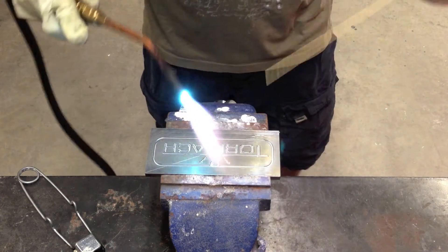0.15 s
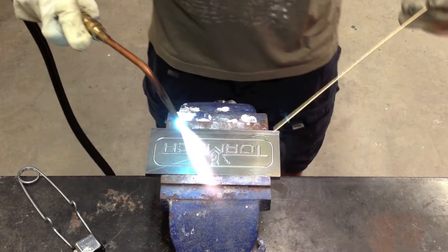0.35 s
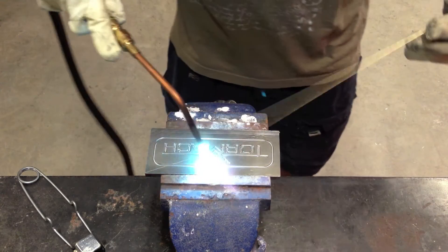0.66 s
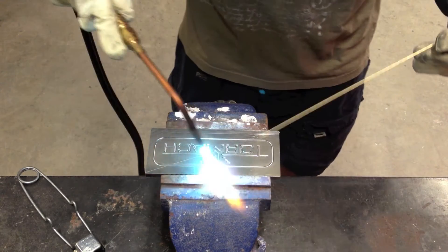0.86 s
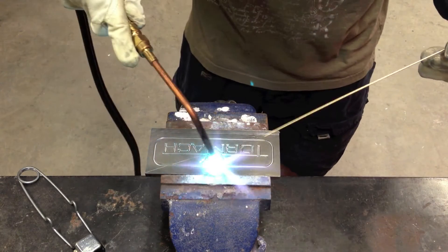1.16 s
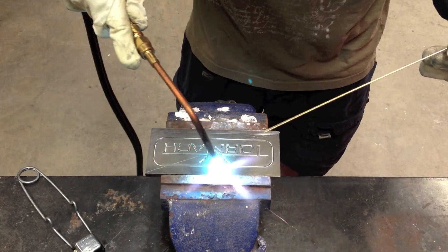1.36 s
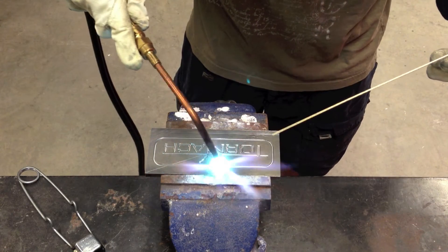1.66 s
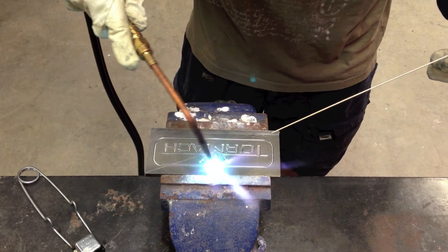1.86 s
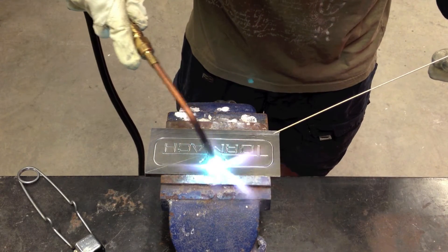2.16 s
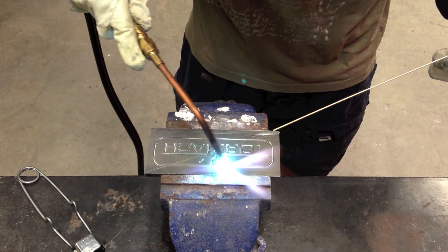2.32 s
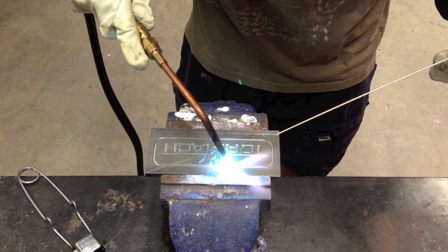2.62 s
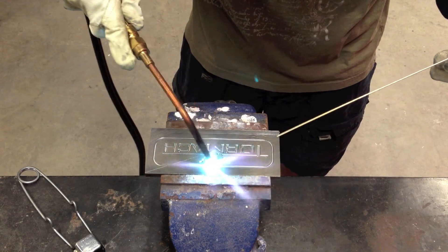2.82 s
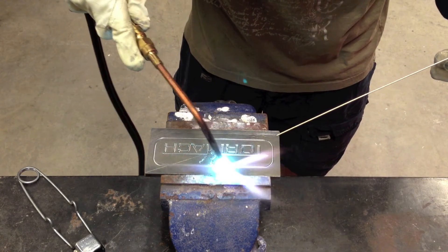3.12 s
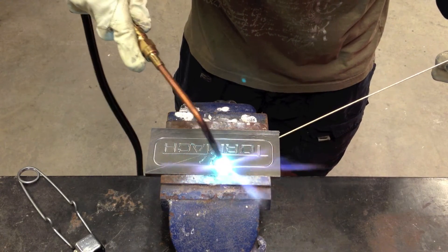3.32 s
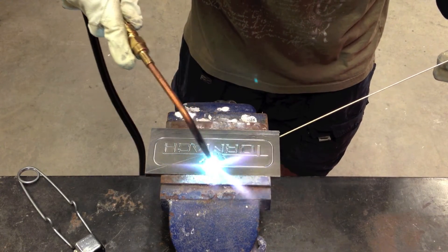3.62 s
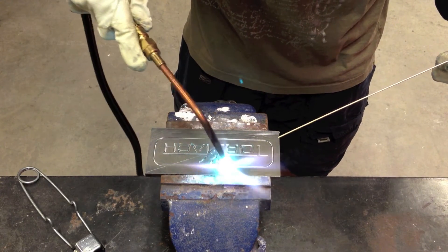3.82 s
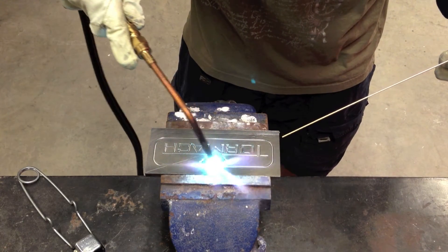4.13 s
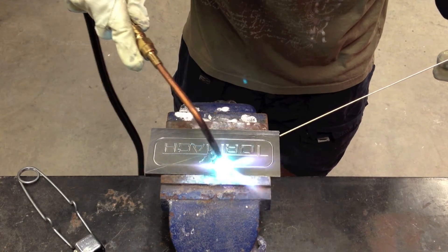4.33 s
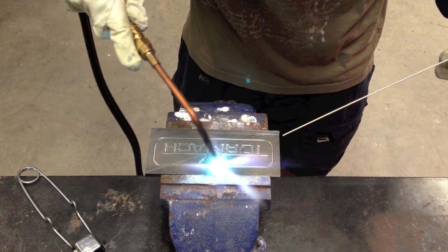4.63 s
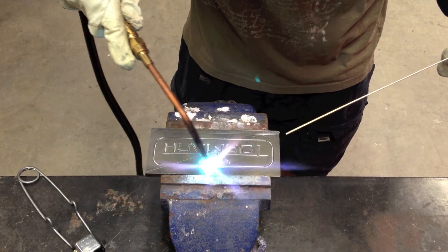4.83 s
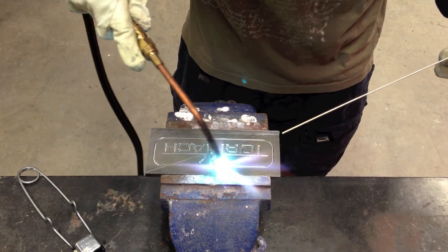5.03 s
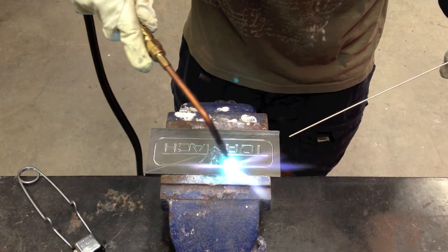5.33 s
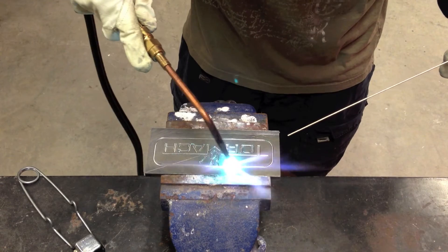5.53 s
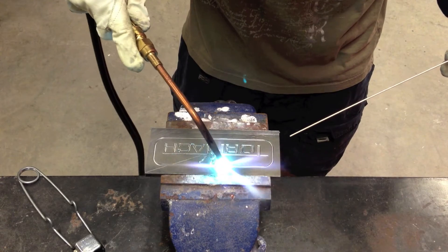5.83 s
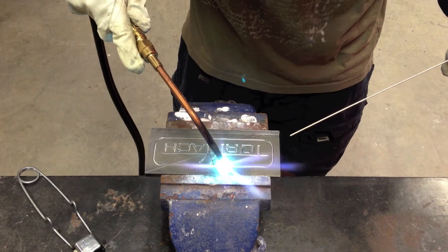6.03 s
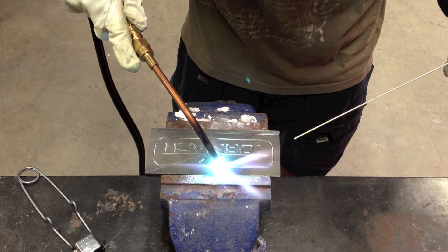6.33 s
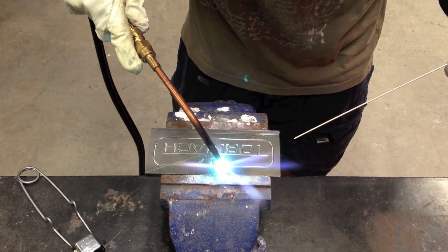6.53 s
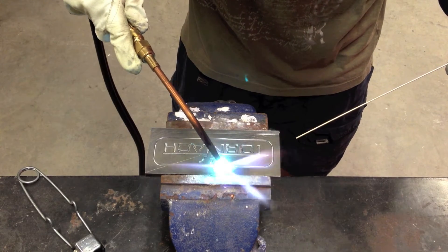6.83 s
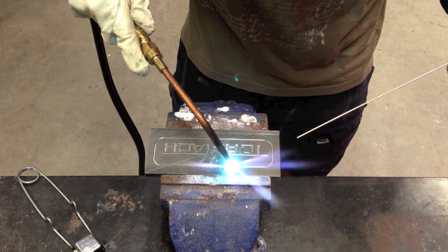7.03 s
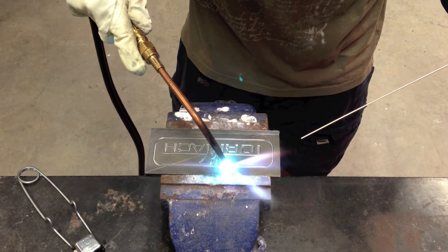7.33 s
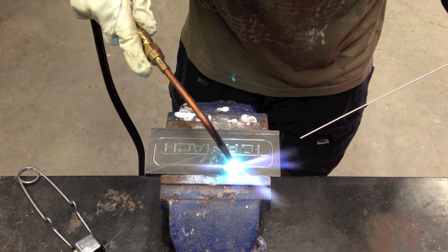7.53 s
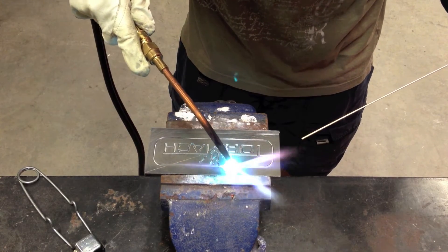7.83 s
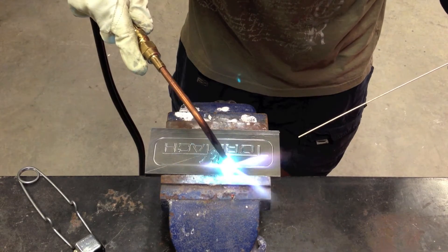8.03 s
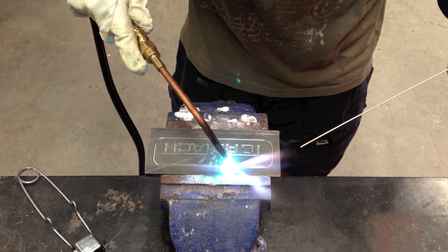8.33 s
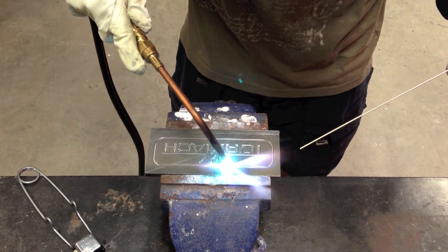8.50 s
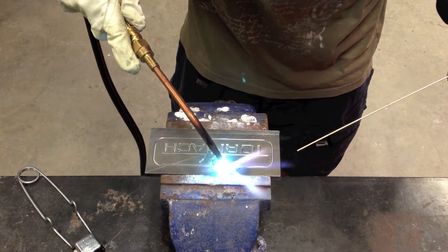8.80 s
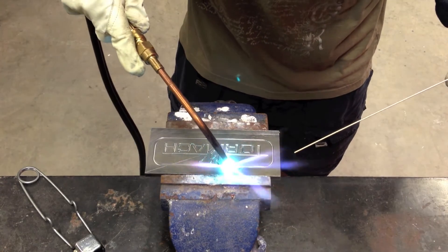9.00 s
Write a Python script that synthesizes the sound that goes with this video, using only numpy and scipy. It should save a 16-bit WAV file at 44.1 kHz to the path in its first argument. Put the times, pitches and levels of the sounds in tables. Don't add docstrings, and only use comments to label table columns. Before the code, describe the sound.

Close burning jet of a welding torch roars and sizzles over a metal plate, then suddenly switches to a more distant, thin, stuttering hiss.

```python
import sys
import numpy as np
from scipy import signal
from scipy.fft import rfft, irfft, next_fast_len
from scipy.io import wavfile
from scipy.ndimage import uniform_filter1d, map_coordinates

SR = 44100
rng = np.random.default_rng(int(sys.argv[2]) if len(sys.argv) > 2 else 0)


def boost_factor(decibels):
    exponent = np.asarray(decibels, float) / 20
    return 10 ** exponent


def store_wav(level_fs):
    pcm = np.round(np.clip(np.atleast_2d(level_fs), -1, 1) * 32767)
    wavfile.write(sys.argv[1], SR, pcm.T.astype(np.int16))


N = 403941

CUT_S = 4.8565
NEAR_TOP_HZ, FAR_TOP_HZ = 15285, 15760
SOUND_CM_PER_S = 34300
HOLLOW_DB_PER_CM, HOLLOW_MAX_DB, HOLLOW_ENDS_S = 2, 6, 0.94
OVERTONE_DB = 0
RIDGE_DB, RIDGE_ENDS_S = 2.5, 0.89
ROAR_DB, ROAR_BELOW, ROAR_TOP_HZ = 3.5, 0.62, 4400
TOUCH_S = 1.084
REACH_OCT_PER_DB = 0.23
SLIP_CHANCE, SLIP_DB = 0.005, -6

# frequency in Hz, level in dB per Hz.
NEAR_COLOUR = [(60, -51), (95, -18), (129, -5), (226, -6.5), (444, -5.5), (637, -2.5), (1090, -4.5),
               (1610, -7.5), (2890, -10.5), (5420, -12), (6300, -7.5), (7440, -4), (9750, -6.5),
               (12500, -1)]
NEAR_SPLITS_HZ = [400, 1300, 3000, 6000, 9800]
# frequency in Hz, width in Hz, boost in dB.
NEAR_RESONANCES = [(240, 9, 8), (343, 18, 5), (403, 8, 11), (452, 35, -6), (547, 30, 5), (659, 25, 5),
                   (755, 25, 4), (812, 50, 4), (910, 30, 4), (1015, 25, -5), (1120, 40, -4), (1215, 25, -5),
                   (1330, 70, 4), (1430, 60, 2), (1577, 45, 3), (1620, 20, -4), (1652, 40, 4),
                   (1955, 30, 4), (2590, 80, 3), (3310, 150, 2), (4970, 250, 3), (5500, 300, 1.5),
                   (7600, 300, .5)]

NEAR_LEVEL_DB = [-47, -40.5, -38.5, -38.5, -28.5, -25]
FREE_AIR_DB = [3.5, 5.5, 6, 6, -7.5, -4]
LANDED_S = [0.87, 1.32, 1.155, 1.156, 0.94, 3.6]
LANDING_FADE_S = [.4, 0.77, .05, .06, 0.17, 2.2]
LIFT_SHARE = [0.34, 0.71, 1.03, 1.3, 0.4, 0.046]
PUFF_SHARE = [0.19, 0.98, 0.41, -0.21, 0.17, 0.06]
SWING_SHARE = [0, 0.063, 0.16, 0.047, 0.38, 1.36]
FLARE_SHARE = [0.087, 0, 0.15, 0, 1.43, 0]

# time in seconds, length in seconds, change in dB.
TIP_LIFTS = [(1.192, 0.14, -0.5), (1.332, 0.12, 5), (1.448, 0.119, -4), (1.621, 0.11, -2),
             (1.8, 0.175, -5.5), (2.089, 0.16, -4), (2.282, 0.089, 1.7), (2.549, 0.066, -2.5),
             (2.662, 0.13, 3), (2.819, 0.23, -3.5), (3.212, 0.11, 1.2), (3.317, 0.097, -5.5),
             (3.43, 0.05, 0.2), (3.72, 0.22, -1.9), (3.902, 0.19, 2), (4.024, 0.071, -1), (4.39, 0.13, 1.5),
             (4.574, 0.11, -4), (4.673, 0.151, 1), (4.834, 0.067, -4.9)]
# time in seconds, length in seconds, change in dB.
PLUME_PUFFS = [(0.715, 0.06, -5), (.865, .07, 4), (0.97, 0.12, -4.5), (1.297, 0.18, -2), (1.92, 0.057, 4),
               (2.475, 0.069, -5), (2.575, 0.13, 3.5), (2.655, 0.082, -5), (2.901, 0.22, -2),
               (3.091, 0.14, -1.5), (3.325, 0.078, -6), (3.65, 0.28, -2.3), (4.068, 0.057, -3),
               (4.498, 0.1, -2.5), (4.59, 0.055, -2.5), (4.66, .08, 1), (4.85, 0.047, -6)]
# time in seconds, length in seconds, change in dB.
JET_SWINGS = [(0.12, 0.173, 3.7), (0.891, 0.048, -8), (0.952, 0.2, 5), (1.231, 0.1, 4.5),
              (1.369, 0.14, -5.5), (1.467, 0.17, 6.5), (1.551, 0.12, -5.5), (1.659, 0.1, 3.6),
              (1.861, 0.041, -3), (2.025, 0.058, 3.5), (2.102, 0.087, -1.5), (2.237, 0.065, 4.5),
              (2.316, 0.17, -6), (2.424, 0.07, 4.5), (2.684, 0.12, -12), (2.71, 0.25, 8),
              (2.912, 0.083, 4.5), (3.091, 0.12, -9), (3.251, 0.31, 5), (3.653, 0.142, 5),
              (3.812, 0.092, -9.5), (4.316, 0.282, 3)]
# time in seconds, length in seconds, change in dB.
CONE_FLARES = [(0.712, 0.091, 4.5), (0.842, 0.045, -2), (1.172, 0.31, -4.5), (1.494, 0.078, -3),
               (1.679, 0.142, -3.1), (1.96, 0.5, -1.6), (2.412, 0.084, -4), (2.896, 0.21, -3),
               (3.003, 0.26, 3), (3.656, 0.17, -5), (3.809, 0.098, 2.5), (3.953, 0.16, -6.5),
               (4.588, 0.066, 2.9), (4.809, 0.13, -3.5)]

# time in seconds, detour of the plate's reflection in cm.
TIP_DESCENT = [
    (0, 12.7),
    (.15, 12),
    (.21, 7.4),
    (.37, 7),
    (.43, 5.2),
    (.5, 3.3),
    (.62, 3),
    (.75, 2.9),
]
# time in seconds, frequency in Hz.
RIDGE_GLIDE = [
    (0, 1040),
    (.3, 1180),
    (.47, 1730),
    (.62, 2600),
]
# time in seconds, delay in milliseconds, strength.
BENCH_ECHO = [
    (0, 1.285, .36),
    (.3, 1.262, .29),
    (.52, 1.24, .16),
    (.8, 1.165, .07),
    (.95, 1.14, .09),
    (1.3, 1.18, .13),
    (2, 1.2, .16),
    (4.9, 1.21, .11),
]

# frequency in Hz, level in dB per Hz.
FAR_COLOUR = [(250, -35), (379, -18.5), (517, -8.5), (798, -8.5), (1030, -10), (1570, -9), (2300, -3.5),
              (3300, -6), (4360, -7.5), (6490, -5.5), (8000, -7), (10200, -8.5), (11300, -10.5),
              (13300, -9)]
FAR_SPLITS_HZ = [1890, 10140, 12300]
# frequency in Hz, width in Hz, boost in dB.
FAR_RESONANCES = [(415, 30, 5), (483, 25, -5), (525, 30, 3), (790, 40, -4), (925, 35, 4), (966, 25, 6),
                  (1290, 25, 4), (1660, 60, -5), (1030, 70, -4), (1380, 50, 4), (1830, 130, -7),
                  (1940, 90, 4), (2060, 60, -6), (2270, 60, -4), (3030, 60, 3), (3330, 200, 3),
                  (3700, 400, 2), (4070, 70, -5), (4720, 60, -1.5), (5320, 60, 4), (6170, 70, -5),
                  (6620, 150, 3), (7940, 90, -5)]
# delay in milliseconds, strength.
FAR_BENCH_ECHOES = [(0.316, 0.11), (0.433, -0.081), (0.581, -0.017), (.63, -0.056), (2.41, 0.1),
                    (2.46, -0.14), (2.9, -.09), (3.03, -0.07), (3.53, -0.08), (3.62, 0.033)]

FAR_LEVEL_DB = [-46, -38, -44.5, -51]
STRIKE_SHARE = [0.25, 0.98, 2, .8]
STUTTER_SHARE = [0.32, 1.22, 1.6, 1]
HEATING_DB_PER_S = [0.18, 0.026, -1.75, -0.2]

# time in seconds, level in dB.
STRIKE_LEVEL = [
    (4.86, -6),
    (5.03, 1.5),
    (5.15, -0.4),
    (6.3, 0.5),
    (6.6, -2.5),
    (7.85, -3),
    (7.97, 0.4),
    (8.85, 0),
    (9.16, -8),
]
# time in seconds, length in seconds, change in dB.
JET_STUTTERS = [(4.89, 0.04, -4.7), (5.259, 0.022, -2.8), (5.391, 0.037, -3.5), (5.476, 0.039, -9),
                (5.56, 0.022, -14), (5.617, 0.028, -1), (6.063, 0.045, -6.7), (6.125, 0.034, -2.5),
                (6.324, 0.034, -3.3), (6.464, 0.024, -4.2), (6.603, 0.053, -7.3), (6.721, 0.034, -7),
                (6.817, 0.047, -4.8), (6.959, 0.079, -1.5), (7.069, 0.035, -6), (7.122, 0.047, -9),
                (7.251, 0.032, -2), (7.522, 0.078, -7.8), (7.647, 0.083, -11), (8.182, 0.05, -1.5),
                (8.593, 0.037, -9), (8.929, 0.06, -2.5), (8.997, 0.06, -10.5), (9.169, 0.084, -11)]
# time in seconds, length in seconds, change in dB.
JET_SURGES = [
    (5.78, .06, 0.5),
    (6.188, 0.033, 0),
    (6.28, .05, 1.5),
    (7.986, .07, 1.5),
    (8.733, 0.034, 2),
    (8.8, .04, 2.5),
]
# time in seconds, level in dB.
WHISTLE_LEVEL = [
    (4.9, -62),
    (6, -60.5),
    (7, -56),
    (9.16, -57),
]
# frequency in Hz, level in dB per Hz.
HISS_COLOUR = [(380, -14), (520, 0), (1000, -7), (2000, -12), (5000, -10), (10000, -7), (12000, -6),
               (14500, 0.5)]


def near_flame():
    air = turbulence(patchy_db=0.87, grit_db=0.85)
    layers = parts(air, NEAR_COLOUR, NEAR_RESONANCES, NEAR_SPLITS_HZ, soft=0.17)
    t = np.arange(N) / SR
    flare_db = bumps(CONE_FLARES)
    moves = np.array([bumps(TIP_LIFTS), bumps(PLUME_PUFFS), bumps(JET_SWINGS), flare_db])
    shares = np.transpose([LIFT_SHARE, PUFF_SHARE, SWING_SHARE, FLARE_SHARE])
    moves_db = shares @ moves + 0.15 * wobble(14)
    own_db = [0.51, 0.74, 0.33, 0.77, 0.8, 0.72]
    flame = np.zeros(N)
    for i, layer in enumerate(layers):
        free_db = FREE_AIR_DB[i] * fading(t, LANDED_S[i], LANDING_FADE_S[i])
        level_db = NEAR_LEVEL_DB[i] + free_db + moves_db[i] + own_db[i] * wobble(12)
        flame += boost_factor(level_db) * layer
    return bench_echo(plume(flame, flare_db))


def plume(x, flare_db):
    hz, t, z = signal.stft(x, SR, nperseg=512)
    hz = hz[:, None]
    detour_cm = np.interp(t, *np.transpose(TIP_DESCENT))
    hollow_hz = SOUND_CM_PER_S / (2 * detour_cm)

    def bell(centre_hz, octaves):
        return np.exp(-(np.log2((hz + 1) / centre_hz) / octaves) ** 2)

    reach = 2 ** (REACH_OCT_PER_DB * np.interp(t, np.arange(N) / SR, flare_db))
    edge_hz = np.minimum(ROAR_BELOW * hollow_hz, ROAR_TOP_HZ) * reach
    shelf = (1 / (1 + ((hz + 1) / edge_hz) ** 8) - .55) * (hz > 440)
    roar_db = ROAR_DB * fading(t, TOUCH_S, 0.052) * shelf
    depth_db = np.minimum(HOLLOW_DB_PER_CM * detour_cm, HOLLOW_MAX_DB) * fading(t, HOLLOW_ENDS_S, .3)
    comb = OVERTONE_DB / HOLLOW_MAX_DB * bell(2 * hollow_hz, .4) - bell(hollow_hz, .2)
    ridge_hz = np.interp(t, *np.transpose(RIDGE_GLIDE))
    ridge_db = RIDGE_DB * fading(t, RIDGE_ENDS_S, .15) * bell(ridge_hz, 0.1)
    gain = boost_factor(ridge_db + roar_db + depth_db * comb)
    return signal.istft(z * gain, SR, nperseg=512)[1][:N]


def bench_echo(flame):
    delay_ms, strength = curves(BENCH_ECHO)
    delay_ms = delay_ms + .008 * wobble(20)

    def late(ms):
        return map_coordinates(flame, [np.arange(N) - ms * SR / 1000])

    return flame + strength * (late(delay_ms) - .9 * late(delay_ms + .05))


def far_flame():
    air = turbulence(patchy_db=0.93, grit_db=1.1)
    layers = parts(air, FAR_COLOUR, FAR_RESONANCES, FAR_SPLITS_HZ, soft=0.19)
    stutter_db = bumps(JET_STUTTERS) + bumps(JET_SURGES)
    heating_s = np.arange(N) / SR - CUT_S
    moves = np.array([curves(STRIKE_LEVEL)[0], stutter_db, heating_s, wobble(25)])
    flicker_db = [0.52, 0.45, 0.96, .9]
    moves_db = np.transpose([STRIKE_SHARE, STUTTER_SHARE, HEATING_DB_PER_S, flicker_db]) @ moves
    own_db = [0.24, 0.3, .9, 1.3]
    flame = np.zeros(N)
    for i, layer in enumerate(layers):
        flame += boost_factor(FAR_LEVEL_DB[i] + moves_db[i] + own_db[i] * wobble(18)) * layer

    def echoes(hz):
        return 1 + sum(g * np.exp(-2j * np.pi * hz * ms / 1000) for ms, g in FAR_BENCH_ECHOES)

    return filtered(flame, echoes)


def whistle():
    phase = 2 * np.pi * np.cumsum(1613 + 4 * wobble(30)) / SR
    level_db = curves(WHISTLE_LEVEL)[0] + 0.52 * wobble(14)
    return np.sqrt(2) * boost_factor(level_db) * np.sin(phase)


def steady_hiss():
    noise = rng.standard_normal(N)
    return boost_factor(-42) * unit(filtered(noise, lambda hz: boost_factor(along(HISS_COLOUR, hz))))


def room(x, wet_db, dull):
    t = np.arange(SR // 8) / SR
    tail = rng.standard_normal(len(t)) * boost_factor(-60 * t / 0.22) * (t > .004)
    tail = signal.lfilter([1 - dull], [1, -dull], tail / np.linalg.norm(tail))
    return x + boost_factor(wet_db) * signal.fftconvolve(x, tail)[:N]


def dropouts(x):
    hz, t, z = signal.stft(x, SR, nperseg=1024)
    hz = hz[:, None]

    def smooth(a):
        return uniform_filter1d(uniform_filter1d(a, size=5, axis=0), size=18, axis=1)

    level_db = 10 * np.log10(np.abs(smooth(np.abs(z) ** 2)) + 1e-14)
    weak_db = np.median(level_db, axis=1, keepdims=True) - level_db
    chance = unit(smooth(rng.standard_normal(z.shape))) + .13 * np.clip(weak_db, -9, 6)
    muted = chance > 2.25 + .9 * (hz < 8500) + 3 * (hz < 4500)
    return signal.istft(z * np.where(muted, boost_factor(-22), 1), SR, nperseg=1024)[1][:N]


def band(x, low_hz, top_hz, order, skirt_hz):
    def response(hz):
        bass_cut = 1 / (1 + (low_hz / (hz + 1)) ** order)
        return bass_cut / (1 + np.exp(np.clip((hz - top_hz) / skirt_hz, -50, 50)))

    return filtered(x, response)


def low_floor(after):
    floor = unit(band(rng.standard_normal(N), 40, 450, order=1, skirt_hz=60))
    return floor * boost_factor(-80 * (1 - after) - 89.5 * after + 1.5 * wobble(15))


def slips(x):
    hz, t, z = signal.stft(x[0], SR, nperseg=2048)
    bands_hz = np.array([4200, 5400, 6800, 8300, 9800, 11300, 12500, 14000, 15700])
    chosen = rng.random((len(bands_hz) - 1, len(t))) < SLIP_CHANCE
    chosen = np.pad(chosen, ((1, 1), (0, 0)))[np.searchsorted(bands_hz, hz)]
    random_phase = np.exp(2j * np.pi * rng.random(z.shape))
    side = signal.istft(chosen * np.abs(z) * boost_factor(SLIP_DB) * random_phase, SR, nperseg=2048)[1][:N]
    return x + np.array([side, -side])


def turbulence(patchy_db, grit_db):
    z = signal.stft(rng.standard_normal(N), nperseg=512)[2]
    field = uniform_filter1d(rng.standard_normal(z.shape), size=7, axis=0)
    field = uniform_filter1d(field, size=12, axis=1)
    air = signal.istft(z * boost_factor(patchy_db * unit(field)), nperseg=512)[1][:N]
    return air * boost_factor(grit_db * wobble(800))


def parts(air, tone, modes, splits, soft):
    edges = np.concatenate([[1], splits, [SR]])

    def above(hz, edge):
        return 1 / (1 + (edge / (hz + 1)) ** (1 / soft))

    def colour_db(hz):
        return along(tone, hz) + sum(db / (1 + (2 * (hz - c) / w) ** 2) for c, w, db in modes)

    def region(low, high):
        return filtered(air, lambda hz: boost_factor(colour_db(hz)) * (above(hz, low) - above(hz, high)))

    return [unit(region(low, high)) for low, high in zip(edges[:-1], edges[1:])]


def bumps(rows):
    t = np.arange(0, N + 64, 64) / SR
    s, length, db = np.transpose(rows)[..., None]
    total_db = np.sum(db * np.exp(-(2 * (t - s) / length) ** 2), axis=0)
    return np.interp(np.arange(N) / SR, t, total_db)


def fading(t, end, span):
    return np.clip((end - t) / span, 0, 1)


def curves(rows):
    s, *columns = np.transpose(rows)
    return [np.interp(np.arange(N) / SR, s, column) for column in columns]


def wobble(rate):
    return map_coordinates(rng.standard_normal(int(N * rate / SR) + 4), [np.arange(N) * rate / SR])


def along(points, hz):
    f, v = np.transpose(points)
    return np.interp(np.log(hz + 1), np.log(f + 1), v)


def filtered(x, response):
    m = next_fast_len(N + 8192)
    return irfft(rfft(x, m) * response(np.fft.rfftfreq(m, 1 / SR)), m)[..., :N]


def unit(x):
    return x / np.sqrt(np.mean(x ** 2) + 1e-20)


def scene():
    near = room(near_flame(), wet_db=-13, dull=.6)
    near = band(dropouts(near), 64, NEAR_TOP_HZ, order=4, skirt_hz=14)
    far = room(far_flame(), wet_db=-16, dull=.2)
    far = band(far + steady_hiss() + whistle(), 403, FAR_TOP_HZ, order=4, skirt_hz=18)
    after = np.clip((np.arange(N) / SR - CUT_S) / .0006, 0, 1)
    mono = (1 - after) * near + after * far + low_floor(after)
    return np.array([mono, mono])


def band_limit(x):
    return signal.sosfilt(signal.butter(12, 16360, fs=SR, output="sos"), x)


def record(dry):
    mix = slips(dry)
    return band_limit(mix)


dry = scene()
out = record(dry)
store_wav(out)
```